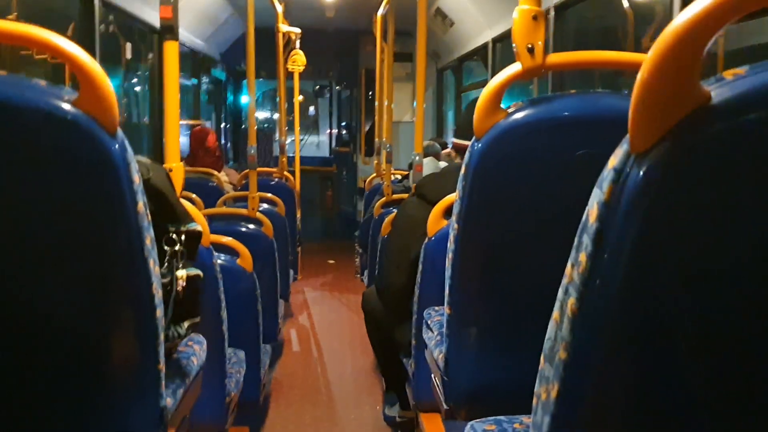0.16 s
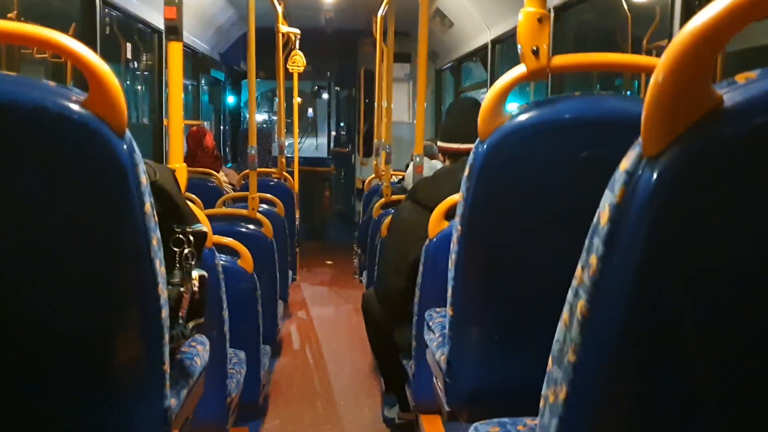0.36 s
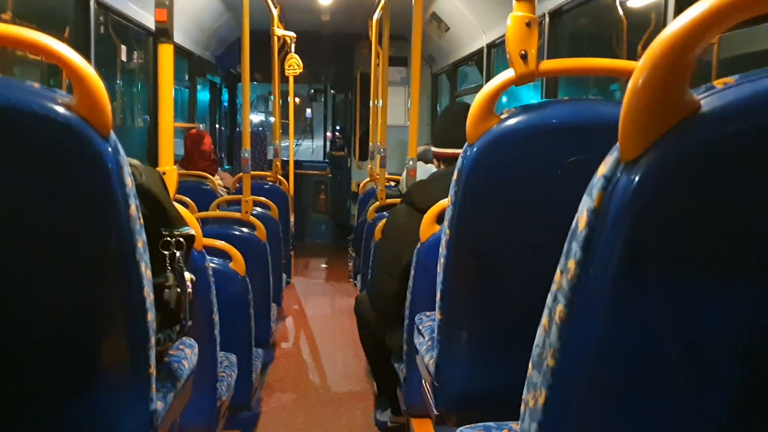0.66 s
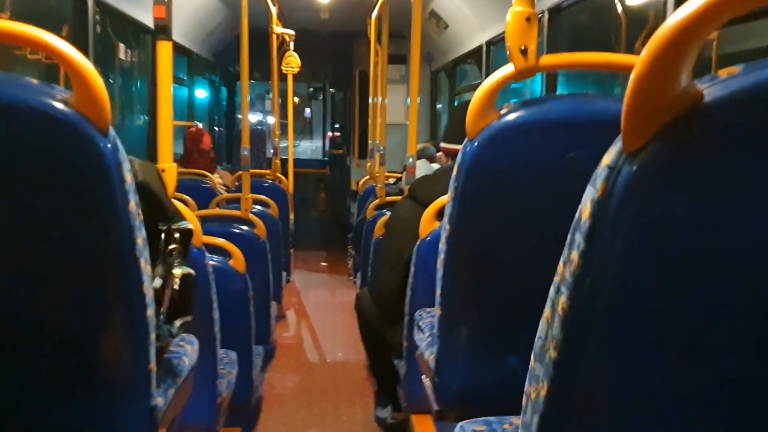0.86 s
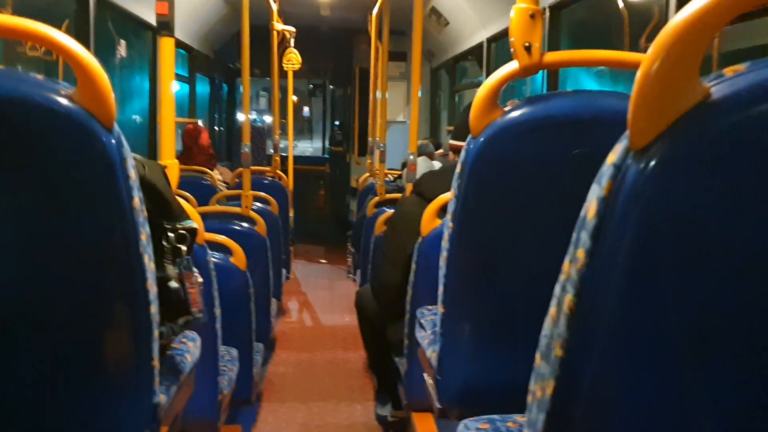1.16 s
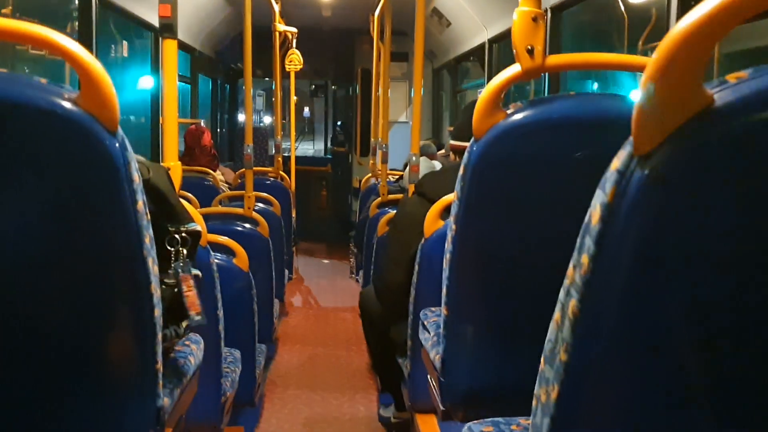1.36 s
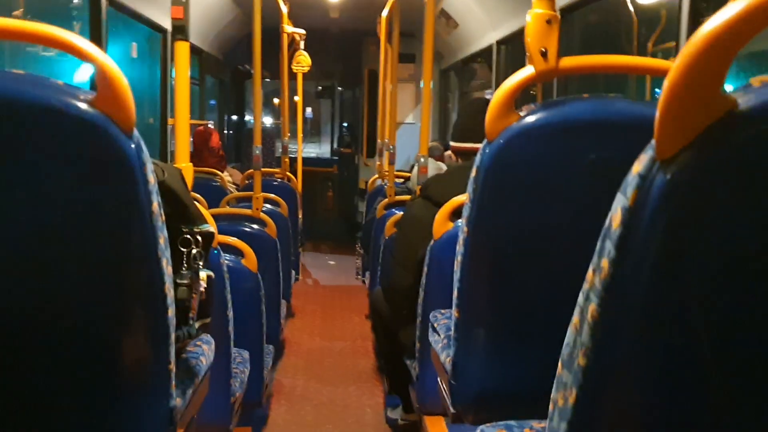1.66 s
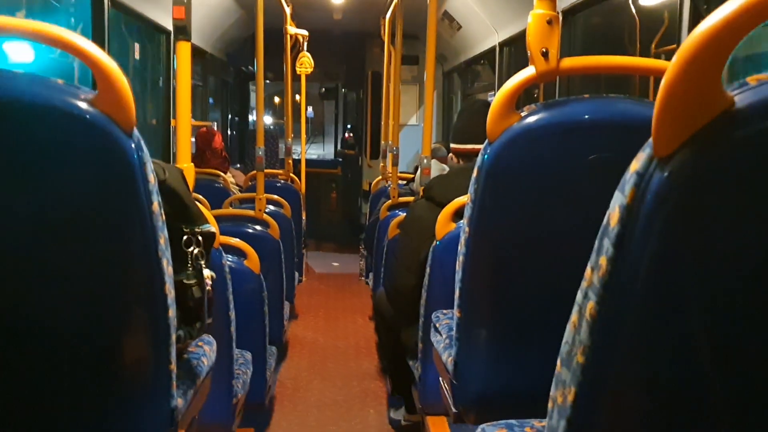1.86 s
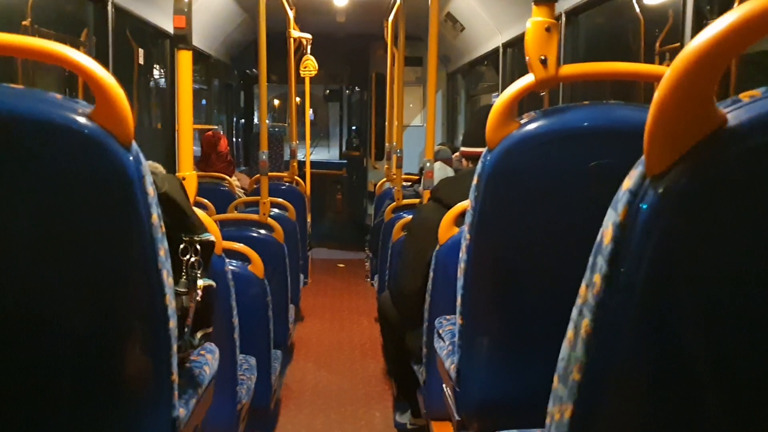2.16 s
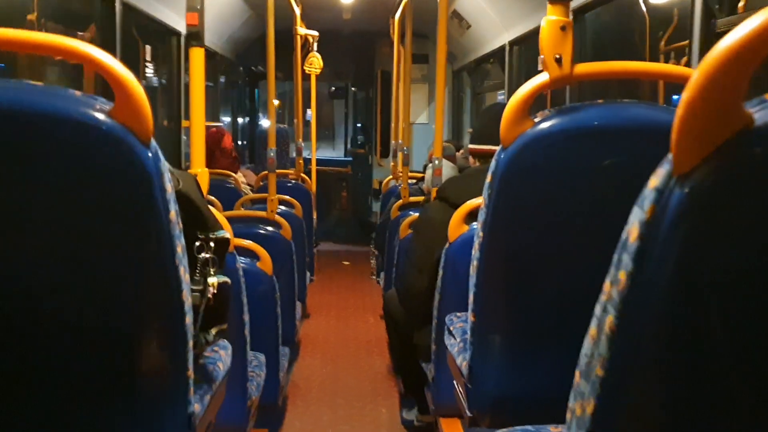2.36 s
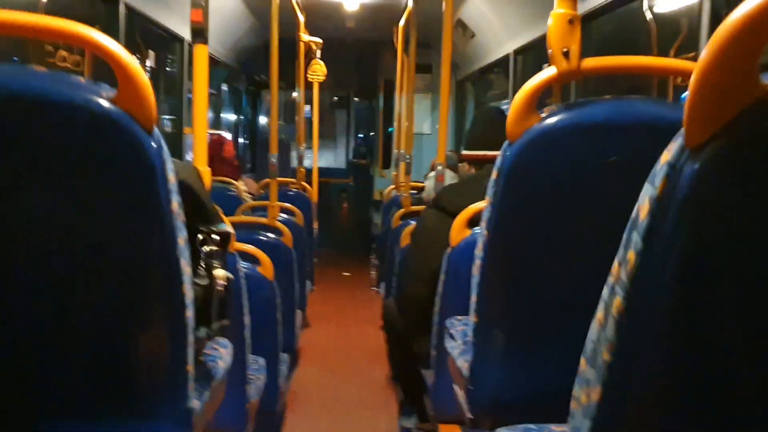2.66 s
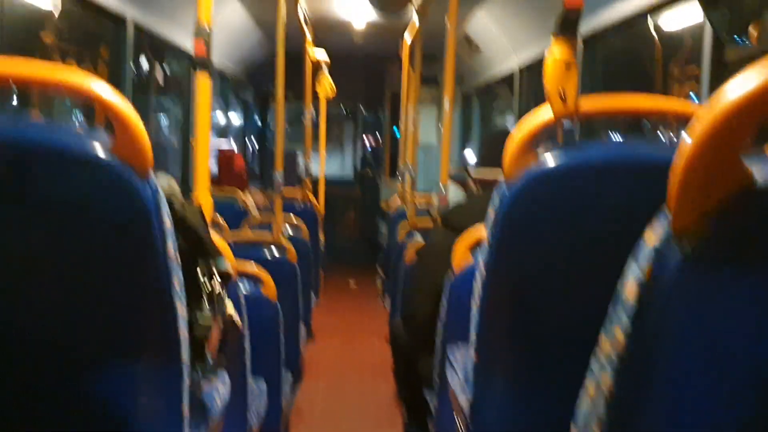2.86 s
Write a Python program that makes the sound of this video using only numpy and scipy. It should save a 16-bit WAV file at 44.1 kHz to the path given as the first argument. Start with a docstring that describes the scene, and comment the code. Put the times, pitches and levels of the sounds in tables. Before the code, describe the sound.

A moving bus heard from inside the cabin: a deep, nearly steady engine drone over booming road rumble and faint tyre noise. Light ticking opens, then knocks, clacks and jingling build from 0.5 to 1.2 seconds, strongest near 0.9. It calms until about 2.0, then hard knocks at 2.15 and 2.5, snaps, rattling trim and brief squeaks around 2.3 to 2.7 continue to the end.

```python
"""Inside a moving bus. The engine drones at a nearly steady speed, built from sines at its firing orders.
Two rough stretches shake the body: struck panel modes knock, trim chatters and clacks,
joints squeak on wavering notes, and a small loose fitting ticks, jingles and snaps.
The road rumbles through the floor as coloured noise and soft thuds.
Hard cabin walls smear every rattle into a short wash: clicks convolved with decaying noise."""
import sys
import numpy as np
from scipy import signal
from scipy.fft import rfft, irfft
from scipy.io import wavfile
from scipy.ndimage import uniform_filter1d

SR = 44100
rng = np.random.default_rng(int(sys.argv[2]) if len(sys.argv) > 2 else 0)


def store_pcm(level_fs):
    """Save levels as 16-bit WAV."""
    pcm = np.round(np.clip(level_fs, -1, 1) * 32767).astype(np.int16)
    wavfile.write(sys.argv[1], SR, np.atleast_2d(pcm).T)


N = 132300


def from_db(db):
    """Decibels to amplitude gain."""
    return 10 ** (np.asarray(db) / 20)


def rms_one(x):
    """Scale to unit power."""
    return x / np.sqrt(np.mean(x ** 2) + 1e-20)


def in_time(rows):
    """A control curve read at every sample, straight lines between its points."""
    return np.interp(np.arange(N) / SR, *np.transpose(rows))


def at_hz(points, hz):
    """Read a spectrum table on a log-frequency axis."""
    table_hz, value = np.transpose(points)
    return np.interp(np.log(hz + 1), np.log(table_hz), value)


def pan(db):
    """Channel gains for a left-minus-right level in dB."""
    return from_db(np.array([[db], [-db]]) / 2)


def waver(hz):
    """Slow random drift of spread 1, rolled off above the given rate."""
    f = np.arange(N // 2 + 1) * SR / N
    spectrum = rfft(rng.standard_normal(N)) / (1 + (f / hz) ** 4)
    return rms_one(irfft(spectrum, N))


# how alike left and right are in the cabin: pitch_hz, correlation (-1 to 1)
LIKENESS = [(30, 0.96), (80, 0.92), (170, 0.96), (350, 0.79), (700, 0.83), (1300, -0.78), (2600, 0.083),
            (15000, -0.086)]


def noise(colour, size=N):
    """Coloured stereo noise of rms 1: shared and opposed parts set the left-right likeness."""
    hz = np.arange(size // 2 + 1) * SR / size
    mid, side = np.exp(2j * np.pi * rng.random((2, len(hz))))
    alike = np.clip(at_hz(LIKENESS, hz), -1, 1)
    both = np.sqrt(1 + alike) * mid + np.sqrt(1 - alike) * side * [[1], [-1]]
    return rms_one(irfft(both * from_db(at_hz(colour, hz)), size))


def cabin(clicks, colour, t60, early_db, early_t60, rise_s=1 / SR):
    """Each contact excites a short early burst and a diffuse tail, both of decaying coloured noise."""
    t = np.arange(SR // 2) / SR
    tail = from_db(-60 * t / t60)
    early = from_db(early_db - 60 * t / early_t60)
    rise = 1 - np.exp(-(t / rise_s) ** 2)
    response = noise(colour, size=len(t)) * (tail + early) * rise
    return signal.fftconvolve(response, clicks[None], axes=1)[:, :N]


def place(s, gains):
    """Clicks of given sizes at given times."""
    return np.bincount(np.clip(s * SR, 0, N).astype(int), gains, N + 1)[:N]


def add(out, s, sound):
    """Mix a stereo sound in at a given time."""
    start = int(np.clip(s * SR, 0, N - 1))
    part = sound[:, :N - start]
    out[:, start:start + part.shape[1]] += part


BOUNCE_S, BOUNCE_LOSS_DB = .0035, 3.5   # mean spacing, and level lost at each bounce


def bouncing(db, count=4):
    """A contact and its weaker, unevenly timed bounces; their summed power carries the level."""
    jitter, sign = rng.random((2, count)) - .5
    k = np.arange(count)
    sizes = from_db(-BOUNCE_LOSS_DB * k)
    gains = from_db(db) * sizes / np.linalg.norm(sizes) * np.sign(sign)
    bounce_s = BOUNCE_S * (k + jitter * (k > 0))
    return np.bincount((SR * bounce_s).astype(int), gains)


def rattling(level_db, per_s, spread_db, colour, t60, early_db, early_t60, rise_s=1 / SR, count=4):
    """Random uneven contacts on a few parts, washed by the cabin and levelled to follow a curve."""
    wash = 0
    for _ in range(count):
        strength = np.minimum(rng.exponential(1, N), 3)
        sizes = from_db(spread_db * strength) * rng.choice([-1, 1], N)
        clicks = sizes * (rng.random(N) < per_s / count / SR)
        wash = wash + cabin(clicks, colour, t60, early_db, early_t60, rise_s)
    power = uniform_filter1d(np.mean(wash ** 2, axis=0), SR // 16)
    return from_db(level_db) * wash / np.sqrt(power + 1e-9)


def ring(x, hz, t60):
    """A two-pole resonator: a unit click sets a decaying sine of height 1 ringing."""
    r = from_db(-60 / (t60 * SR))
    w = 2 * np.pi * hz / SR
    return signal.lfilter([0, np.sin(w)], [1, -2 * r * np.cos(w), r * r], x + 1e-18)


# engine firing rate: time_s, pitch_hz
FIRING = [(0, 45.5), (.7, 45.1), (.92, 47.86), (1.2, 45.6), (1.5, 45.88), (2.1, 46.18), (2.3, 47.8),
          (2.39, 49.66), (2.52, 46.85), (3, 47.1)]
# swell and dip of the drone, before order levels: time_s, level_db
DRONE = [(0.0, -21), (0.22, -19.5), (0.29, -26), (0.5, -16.5), (0.62, -20), (0.65, -18.5), (0.73, -25),
         (0.75, -18), (0.89, -16), (0.95, -29), (1.09, -15.5), (1.13, -27), (1.44, -19.5), (2.1, -19),
         (2.4, -13), (2.44, -23.5), (2.51, -12.5), (2.57, -36), (2.61, -17), (2.7, -32), (2.74, -23),
         (2.9, -16), (2.94, -34), (3.0, -36)]
# engine orders, relative to the drone: multiple of the firing rate, level_db
ORDERS = [(1, 3.5), (1.5, -18), (2, -16), (3, -17), (4, -21.5), (5, -25)]
LOW_PAN_DB = 1.5


def engine(rough=1.0, steady_rough=0.085):
    """A strong firing sine follows the drone curve; weaker orders waver more around its mean level."""
    phase = 2 * np.pi * np.cumsum(in_time(FIRING)) / SR
    drone_db = in_time(DRONE)
    firing = from_db(drone_db + ORDERS[0][1]) * np.sin(phase) * (1 + steady_rough * waver(1.7))
    upper = 0
    for multiple, db in ORDERS[1:]:
        tone = np.sin(multiple * phase + 2 * np.pi * rng.random())
        upper = upper + from_db(db) * tone * (1 + rough * waver(3.4))
    return (firing + from_db(drone_db.mean()) * upper) * pan(LOW_PAN_DB)


# jolts: start_s, level_db (direct sound, first 20 ms), hardness_hz, panel_pitch_hz
KNOCKS = [(.078, -32, 500, 293), (.277, -25.5, 450, 280), (.545, -20, 500, 165), (.615, -25.5, 400, 171),
          (.746, -21, 500, 297), (.812, -26, 700, 290), (0.857, -17, 300, 163), (.881, -22.5, 2500, 523),
          (.913, -21.5, 450, 275), (.94, -37, 900, 525), (.962, -27, 1200, 690), (.996, -20, 498, 218),
          (1.048, -26, 400, 170), (1.088, -24, 460, 346), (1.183, -27, 1080, 490), (1.328, -28.5, 400, 302),
          (2.069, -20, 355, 203), (2.149, -15.5, 1520, 312), (2.451, -25.5, 3000, 680),
          (2.489, -15, 1800, 286), (2.556, -22, 1500, 277), (2.722, -21.5, 400, 321.2),
          (2.755, -30, 899, 500), (2.816, -32, 452, 250), (2.888, -21.5, 400, 279.8),
          (2.974, -24, 600, 420)]
# body panel modes, before each knock's emphasis and detune: pitch_hz, level_db, t60_s
BODY_MODES = [(156.97, 4, 0.112), (181, 1.5, 0.1), (217.4, -6, 0.063), (276, -1, 0.051), (323, 0, 0.061),
              (379.7, 0.5, 0.071), (498, -8.5, 0.12), (549, -11, 0.12), (655, -12, 0.1), (830, -4.5, 0.036),
              (915, 0, 0.057), (1067, -7, 0.046)]
# tint of the cabin's answer to a knock: pitch_hz, level_db (relative)
KNOCK_ROOM_COLOUR = [(100, -1), (400, 3.5), (900, 5), (3000, 12)]
KNOCK_RING_DB, KNOCK_RING_OCTAVES = 9.5, .38   # lift of the modes near the struck panel's pitch
MODE_SPREAD_DB, MODE_DETUNE = 3, .025   # random change per strike: level, share of pitch
KNOCK_ROOM_DB, KNOCK_ROOM_T60_S, KNOCK_ROOM_RISE_S = -8, .16, .005
BODY_PAN_DB = .6   # shared by the knocks and the road thuds


def knocks():
    """Jolts push panel modes, favouring those near the struck panel's pitch; hard contacts are brighter."""
    direct = np.zeros(N + SR)
    for s, db, hard_hz, panel_hz in KNOCKS:
        push = np.exp(-2 * np.pi * hard_hz * np.arange(SR // 4) / SR)
        thump = 0
        for k, (hz, mode_db, t60) in enumerate(BODY_MODES):
            strength, detune = rng.standard_normal(2)
            octaves = np.log2(hz / panel_hz)
            near_db = KNOCK_RING_DB * np.exp(-.5 * (octaves / KNOCK_RING_OCTAVES) ** 2)
            gain = from_db(mode_db + near_db + MODE_SPREAD_DB * strength)
            polarity = (-1) ** (k // 3)   # flips every three modes
            thump = thump + polarity * gain * ring(push, hz * (1 + MODE_DETUNE * detune), t60)
        start = int(s * SR)
        direct[start:start + len(push)] += from_db(db) * thump / thump[:SR // 50].std()
    direct = direct[:N]
    room = cabin(direct, KNOCK_ROOM_COLOUR, KNOCK_ROOM_T60_S, 0, .03, KNOCK_ROOM_RISE_S)
    room = rms_one(room) * direct.std() * from_db(KNOCK_ROOM_DB)
    return (direct + room) * pan(BODY_PAN_DB)


# chatter of the trim, before CHATTER_DB: time_s, level_db
CHATTER = [(0, -40.5), (.4, -39.5), (.51, -36), (.56, -33), (.7, -36.5), (.85, -33), (.9, -28), (1.0, -30),
           (1.12, -34.5), (1.32, -42), (1.55, -44), (1.88, -47), (2.01, -43), (2.07, -32), (2.27, -39.5),
           (2.41, -35), (2.46, -31.5), (2.65, -34), (2.78, -31), (3, -34.5)]
# chatter spectrum: pitch_hz, level_db (relative, per Hz)
CHATTER_COLOUR = [(100, -28), (300, -56), (600, 9), (950, 9.5), (1300, 6.5), (2000, 2), (3800, 0.5),
                  (4700, -4.5), (6900, -13), (7500, -16), (10000, -27), (15500, -40)]
# single panel clacks, before CLACK_DB: start_s, level_db, ring_centre_hz
CLACKS = [(0.083, -42, 2980), (.154, -30.5, 1320), (.157, -37, 3470), (.279, -40, 1600), (.545, -29, 2250),
          (.566, -33, 2500), (0.61, -35, 5530), (0.719, -35.5, 2000), (0.792, -31.5, 4600),
          (.879, -23.5, 1100), (0.955, -25.5, 2100), (0.988, -32.5, 4500), (1.042, -34, 2030),
          (1.109, -39, 2390), (1.174, -34, 2440), (1.208, -40.5, 2200), (1.259, -39, 3300),
          (1.402, -38, 2900), (1.584, -39.5, 4845), (1.658, -37, 4460), (1.685, -40.5, 4200),
          (1.812, -44.5, 4005), (1.917, -47, 3000), (2.029, -38.5, 2960), (2.094, -37, 2933),
          (2.124, -33.5, 2840), (2.172, -34, 2710), (2.224, -33.5, 2880), (2.3, -33.5, 2840),
          (2.441, -35, 4030), (2.448, -28.5, 2420), (2.515, -32, 2595), (2.588, -35.5, 2220),
          (2.627, -36, 3000), (2.675, -36.5, 5620), (2.682, -31, 1680), (2.752, -25.5, 1520),
          (2.81, -33.5, 2600), (2.851, -33.5, 2800), (2.909, -31.5, 3500), (2.939, -35.5, 2880),
          (2.969, -42, 2170)]
# clack spectrum before each panel's own ring: pitch_hz, level_db (relative, per Hz)
CLACK_COLOUR = [(100, -30), (300, -32), (900, 14.5), (1600, 8.5), (2800, 3), (4000, -0.5), (6700, -5.5),
                (7600, -34), (9500, -12), (11000, -30), (16000, -34)]
CHATTER_DB, CHATTERS_PER_S, CLACK_DB = -4, 900, -1
PANEL_RING_DB, PANEL_RING_OCTAVES, PANEL_T60_S = 8.5, .45, .14
PANEL_PEAK_DB, PANEL_PEAK_OCTAVES = 3.5, .03   # the main mode stands out of the broad ring
TRIM_PAN_DB = 6


def trim():
    """Panels chatter in dense random contacts; louder clacks bounce and ring at their own pitch."""
    out = rattling(in_time(CHATTER) + CHATTER_DB, CHATTERS_PER_S, 2.9, CHATTER_COLOUR, .16, 0, .016)
    hz = np.geomspace(100, 16000, 200)
    for s, db, ring_hz in CLACKS:
        octaves = np.log2(hz / ring_hz)
        broad_db = PANEL_RING_DB * np.exp(-.5 * (octaves / PANEL_RING_OCTAVES) ** 2)
        peak_db = PANEL_PEAK_DB * np.exp(-.5 * (octaves / PANEL_PEAK_OCTAVES) ** 2)
        colour = np.column_stack([hz, at_hz(CLACK_COLOUR, hz) + broad_db + peak_db])
        add(out, s, cabin(bouncing(db + CLACK_DB), colour, PANEL_T60_S, -4, .0088))
    return out * pan(TRIM_PAN_DB)


# jingle of the loose fittings, before JINGLE_DB: time_s, level_db
JINGLE = [(0, -79), (.41, -83), (.45, -47), (.62, -35.5), (.77, -40), (.95, -38.5), (1.04, -38.5),
          (1.2, -55), (1.45, -80), (1.62, -49), (1.85, -61), (2.02, -54), (2.12, -47), (2.28, -71),
          (2.42, -43), (2.47, -39), (2.7, -46.5), (3, -46.5)]
# jingle spectrum: pitch_hz, level_db (relative, per Hz)
JINGLE_COLOUR = [(200, -30), (800, -18), (2500, 8.5), (6700, 6.5), (7600, -3.5), (10500, -4), (12500, -4),
                 (14500, -3), (16000, -11)]
# ticks of the loose fitting, before TICK_DB: start_s, level_db
TICKS = [(0.01, -45.5), (.082, -48), (.153, -46.5), (0.214, -46.5), (.286, -51), (.349, -50), (.423, -44),
         (.528, -40.5), (.61, -46), (0.715, -40.5), (.793, -48), (0.876, -38), (0.93, -35.5), (.96, -39),
         (1.015, -40), (1.08, -48.5), (1.12, -43), (1.202, -49), (1.277, -49), (1.349, -50.5), (1.411, -52),
         (1.477, -49), (1.546, -61), (1.62, -64), (1.701, -55), (1.761, -61), (1.917, -51.5), (2.04, -45.5),
         (2.095, -49), (2.148, -42), (2.233, -47), (2.303, -46.5), (2.363, -50), (2.441, -39), (2.488, -40),
         (2.554, -41), (2.585, -41.5), (2.647, -42), (2.675, -43), (2.736, -41), (2.852, -41), (2.98, -47)]
# spectrum of ticks (before their random tilt) and snaps: pitch_hz, level_db (relative, per Hz)
TICK_COLOUR = [(200, -30), (800, -28), (2500, 5), (6500, 3.5), (7600, -3), (10500, -3.5), (12500, -1.5),
               (14500, 0), (16000, -5.5)]
# sharp snaps of a fitting close by: start_s, level_db (of the click)
SNAPS = [(.795, -33.5), (.989, -36), (1.123, -39.5), (2.044, -44), (2.149, -35.5), (2.4887, -27),
         (2.554, -32), (2.984, -42)]
JINGLES_PER_S, JINGLE_DB = 1200, -2
TICK_DB, TICK_T60_S, TICK_RISE_S = 2, .19, .0018
TICK_DIRECT_DB, TICK_DIRECT_S = -6, .04   # early burst: level, t60
TICK_TILT_DB, TICK_LENGTH_SPREAD = .6, .15   # tick-to-tick change: brightness per octave, log ring time
SNAP_T60_S, SNAP_WIDTH = .018, .55   # width: gain of the side signal
TICK_PAN_DB = 4.5


def fittings():
    """Loose metal ticks with varied brightness and ring, dense contacts jingle, and dry snaps sit central."""
    out = rattling(in_time(JINGLE) + JINGLE_DB, JINGLES_PER_S, 3.0, JINGLE_COLOUR, .46, 4.8, .0053)
    for s, db in TICKS:
        tilt, length = rng.standard_normal(2)
        colour = [(hz, level + TICK_TILT_DB * tilt * np.log2(hz)) for hz, level in TICK_COLOUR]
        t60 = TICK_T60_S * np.exp(TICK_LENGTH_SPREAD * length)
        add(out, s, cabin(bouncing(db + TICK_DB), colour, t60, TICK_DIRECT_DB, TICK_DIRECT_S, TICK_RISE_S))
    s, db = np.transpose(SNAPS)
    # the two cabin channels serve as middle and side
    mid, side = cabin(place(s, from_db(db)), TICK_COLOUR, SNAP_T60_S, -11, .0028)
    return out * pan(TICK_PAN_DB) + mid + SNAP_WIDTH * side * [[1], [-1]]


# rubbing joints: middle_s, half_length_s, pitch_hz (centre), level_db (sine peak before grip and pan)
SQUEAKS = [(2.275, 0.039, 658, -37.5), (2.513, .022, 660, -34), (2.673, 0.025, 672, -35),
           (2.69, 0.035, 903, -31.5)]
SQUEAK_WIDTH_HZ = 14.5   # spread of the pitch
SQUEAK_GRIP_SHARE, SQUEAK_GRIP_HZ = .35, 45   # depth and rate of the catching
SIDE_PAN_DB = 6   # shared by the squeaks and the tyre noise


def squeak():
    """Rubbing joints sing briefly, each a sine whose pitch and strength waver as it catches and slips."""
    t = np.arange(N) / SR
    out = 0
    for s, half_s, hz, db in SQUEAKS:
        phase = 2 * np.pi * np.cumsum(hz + SQUEAK_WIDTH_HZ * waver(127)) / SR
        grip = 1 + SQUEAK_GRIP_SHARE * waver(SQUEAK_GRIP_HZ)
        swell = np.exp(-.5 * ((t - s) / half_s) ** 4)
        out = out + from_db(db) * grip * swell * np.sin(phase)
    return out * pan(SIDE_PAN_DB)


# road boom under the floor, before BOOM_DB: time_s, level_db
BOOM = [(0, -30.5), (.36, -31), (.5, -19.5), (.65, -20), (.72, -28.5), (.88, -16.5), (1.05, -21),
        (1.19, -20), (1.4, -35), (1.5, -34.5), (1.55, -21), (1.67, -32), (2.02, -30), (2.08, -18),
        (2.15, -29.5), (2.35, -24), (2.55, -21.5), (2.79, -18), (2.86, -22), (3, -22.5)]
# boom spectrum: pitch_hz, level_db (relative, per Hz)
BOOM_COLOUR = [(8, -38), (18, -29), (25, 14), (33, 10), (45, 6), (64, 16.5), (78, 12.5), (95, 1.5),
               (115, -2.5), (200, -55)]
# shaking of the body, before BODY_DB: time_s, level_db
SHAKE = [(0, -28), (.35, -29.5), (.54, -26), (.69, -29.5), (.8, -28), (.89, -20.5), (1.0, -22.5),
         (1.12, -26.5), (1.3, -27.5), (1.5, -34.5), (1.85, -34), (2.05, -28), (2.38, -28), (2.52, -25),
         (2.72, -22), (3, -27)]
# body thud spectrum: pitch_hz, level_db (relative, per Hz)
BODY_COLOUR = [(20, -35), (60, 4), (115, -6), (165, 0), (215, -3), (290, -1.5), (370, -4.5), (440, -10.5),
               (520, -10), (590, -16), (850, -17), (1200, -27), (2500, -30), (6000, -75)]
# tyre noise spectrum: pitch_hz, level_db (relative, per Hz)
TYRE_COLOUR = [(20, 4), (100, 4.5), (230, 9), (340, -2), (420, -4), (600, -4), (700, -5.5), (900, -3.5),
               (1000, -13), (2200, -20), (6300, -32), (8000, -47), (15000, -88)]
BOOM_DB, BODY_DB, TYRE_DB = 1, -1, -35.5
THUDS_PER_S, THUD_RISE_S = 190, .003


def road():
    """Floor boom of levelled low noise, small soft thuds in the body and steady tyre noise."""
    boom = noise(BOOM_COLOUR)
    boom_power = uniform_filter1d(np.mean(boom ** 2, axis=0), SR // 8)
    boom = from_db(in_time(BOOM) + BOOM_DB) * boom / np.sqrt(boom_power)
    body = rattling(in_time(SHAKE) + BODY_DB, THUDS_PER_S, 2.65, BODY_COLOUR, .4, 13.7, .057, THUD_RISE_S)
    tyres = from_db(TYRE_DB) * noise(TYRE_COLOUR)
    return boom + body * pan(BODY_PAN_DB) + tyres * pan(SIDE_PAN_DB)


PORT_LAG_S = .00027   # engine, knocks and road reach the right microphone first


def scene():
    """Mix all layers; engine, knocks and road arrive slightly later on the left."""
    left, right = engine() + knocks() + road()
    n = np.arange(N)
    late_left = np.interp(n - np.round(PORT_LAG_S * SR), n, left)
    return np.stack([late_left, right]) + trim() + fittings() + squeak()


CUTOFF_HZ = 15900


def record(dry):
    """The microphone loses the deepest bass; the top is cut steeply."""
    bass_cut = signal.butter(1, 10, "high", fs=SR, output="sos")
    top_cut = signal.ellip(12, .2, 80, CUTOFF_HZ, fs=SR, output="sos")
    return signal.sosfilt(top_cut, signal.sosfilt(bass_cut, dry))


dry = scene()
out = record(dry)
store_pcm(out)
```